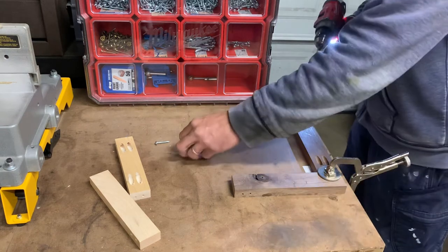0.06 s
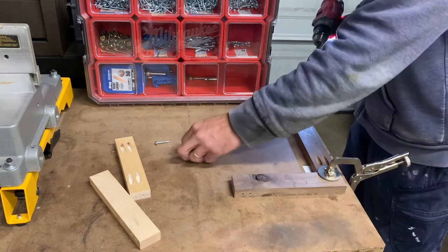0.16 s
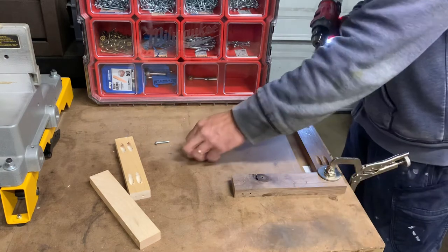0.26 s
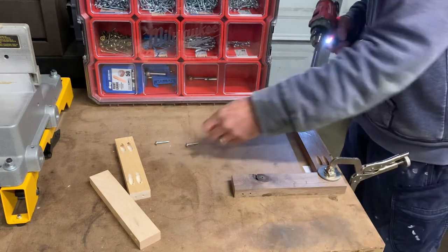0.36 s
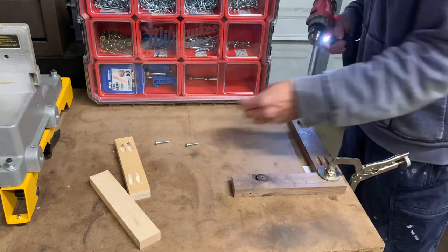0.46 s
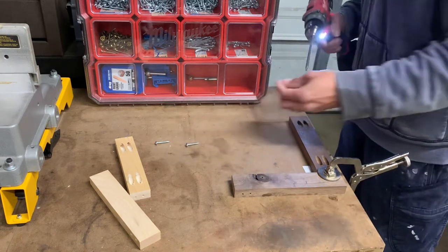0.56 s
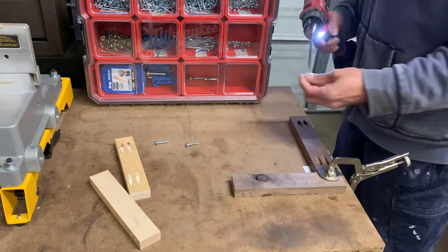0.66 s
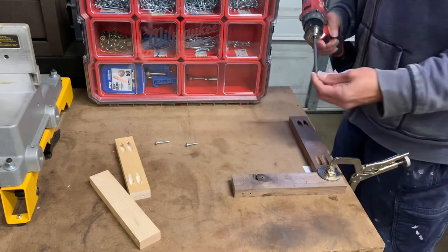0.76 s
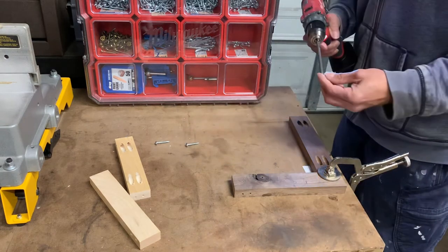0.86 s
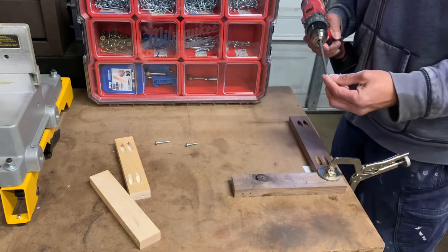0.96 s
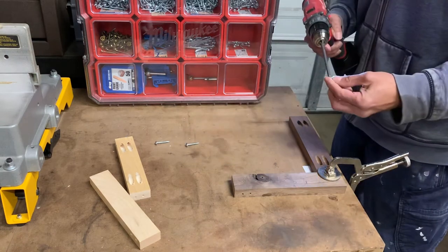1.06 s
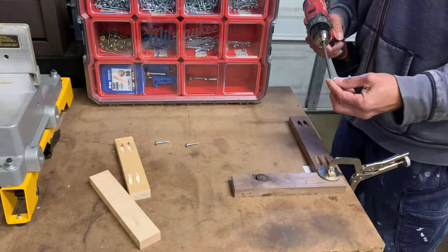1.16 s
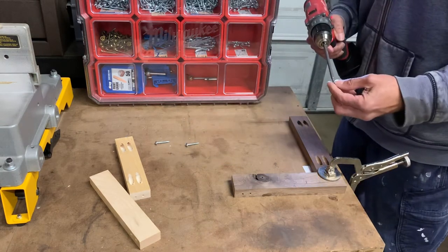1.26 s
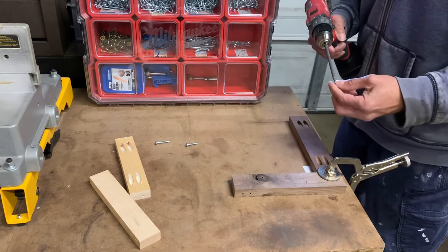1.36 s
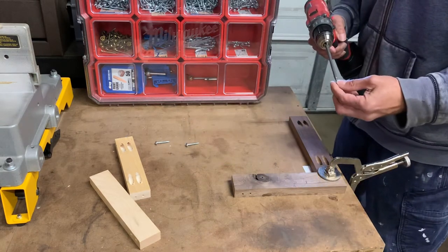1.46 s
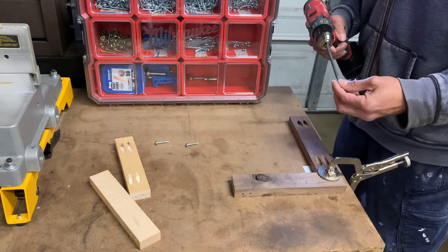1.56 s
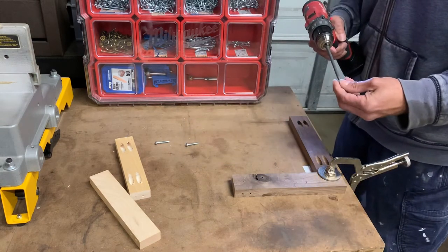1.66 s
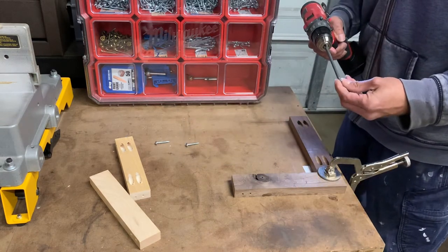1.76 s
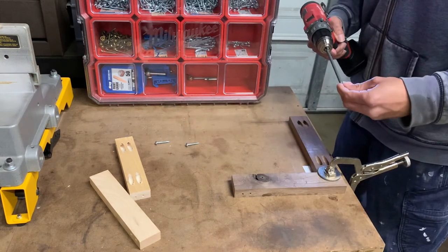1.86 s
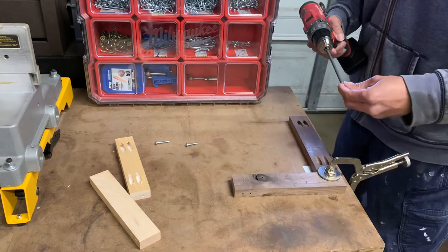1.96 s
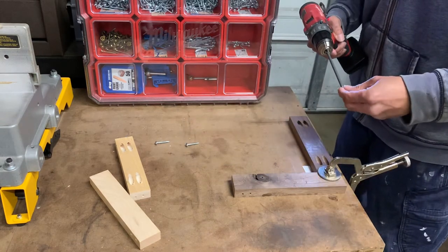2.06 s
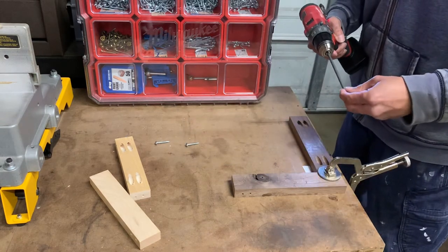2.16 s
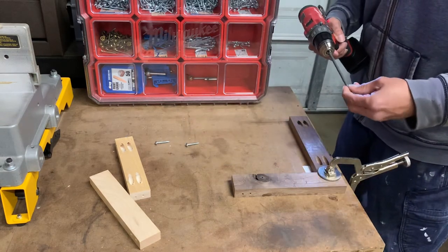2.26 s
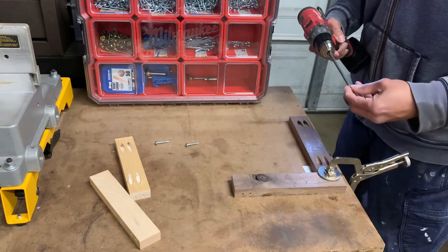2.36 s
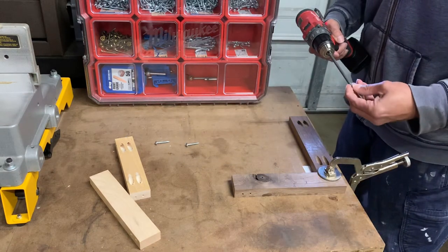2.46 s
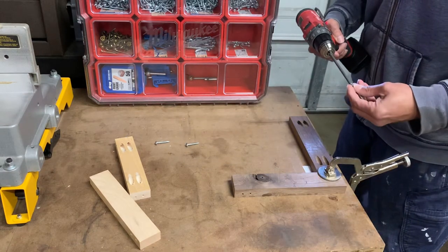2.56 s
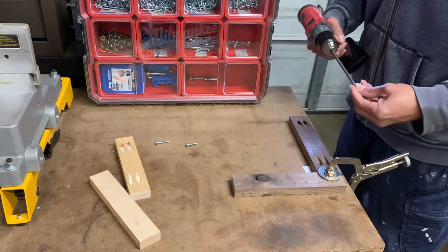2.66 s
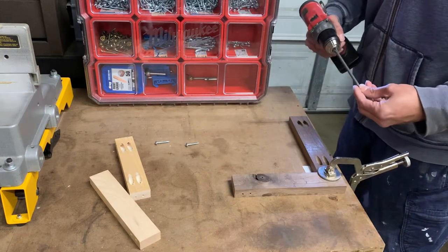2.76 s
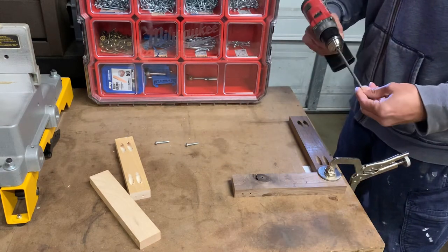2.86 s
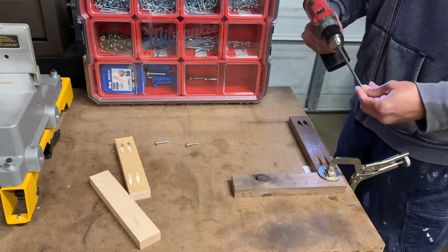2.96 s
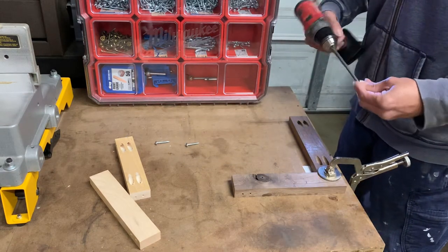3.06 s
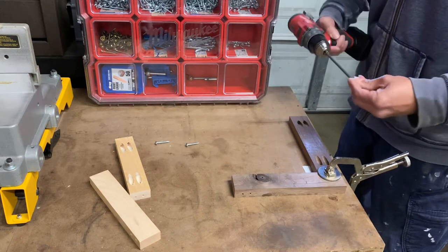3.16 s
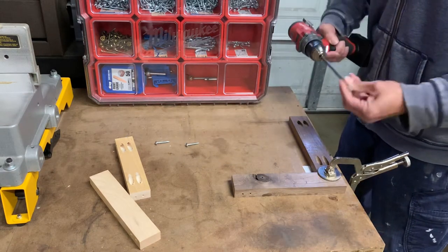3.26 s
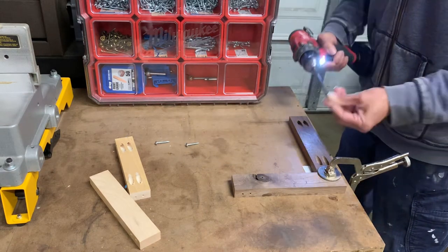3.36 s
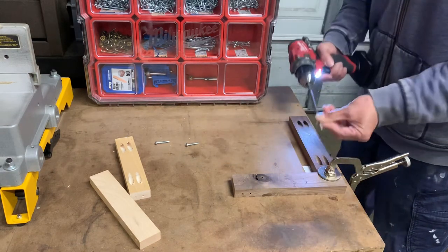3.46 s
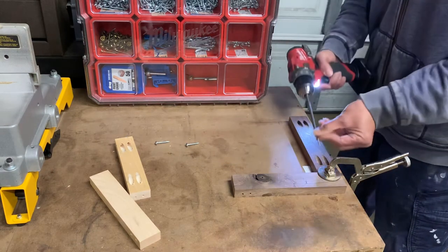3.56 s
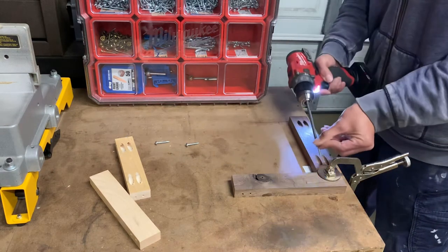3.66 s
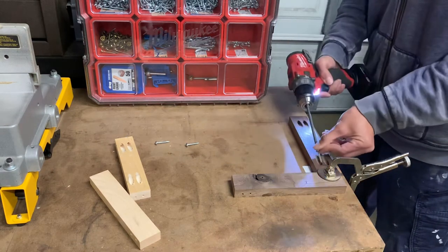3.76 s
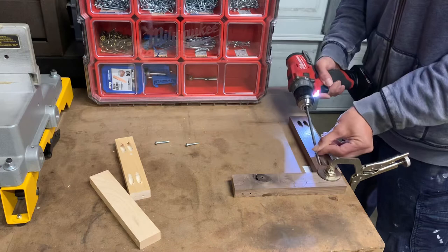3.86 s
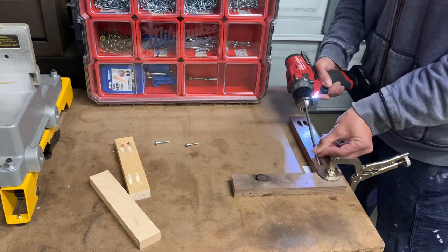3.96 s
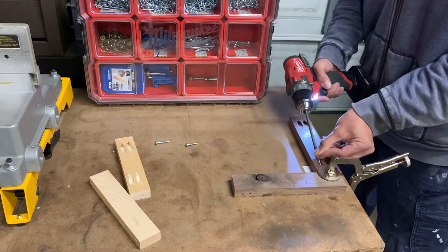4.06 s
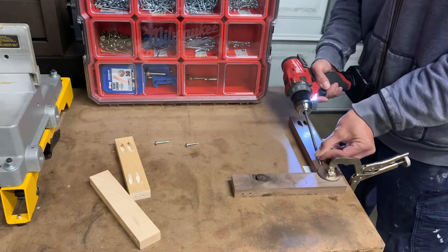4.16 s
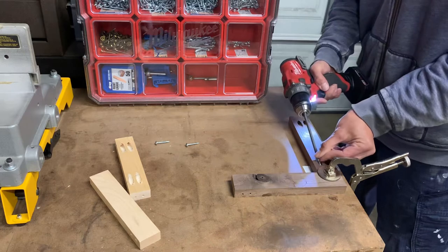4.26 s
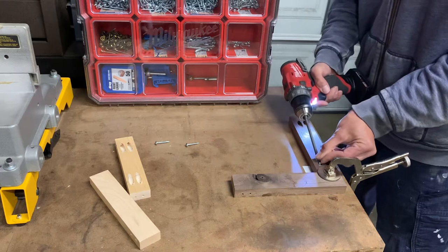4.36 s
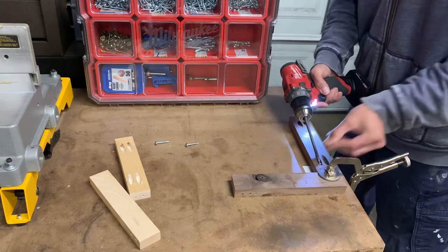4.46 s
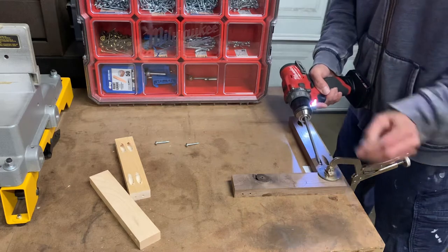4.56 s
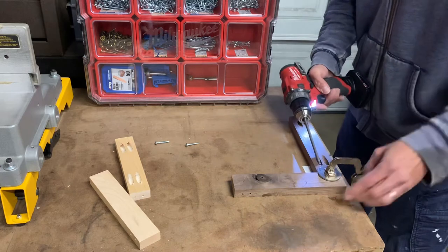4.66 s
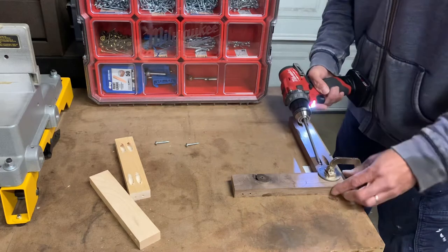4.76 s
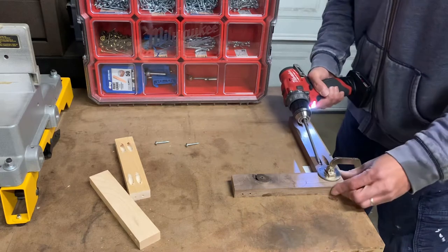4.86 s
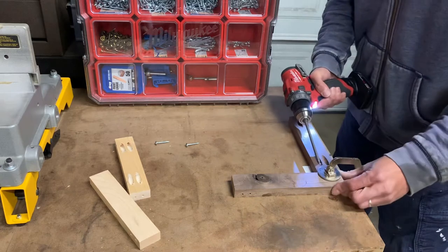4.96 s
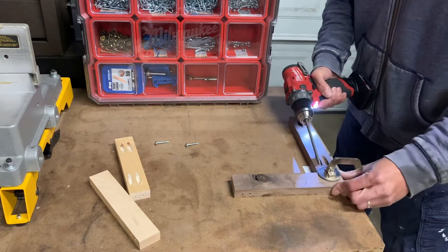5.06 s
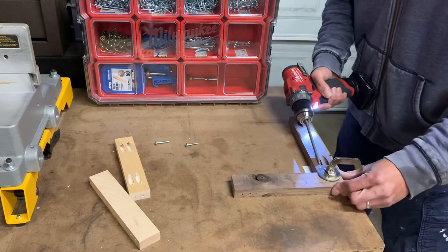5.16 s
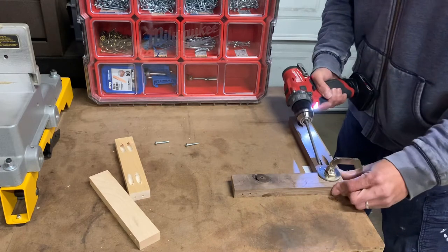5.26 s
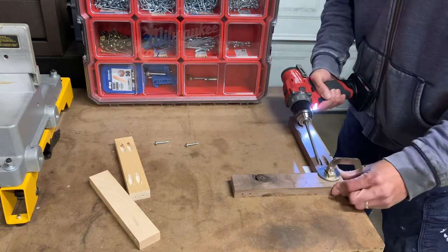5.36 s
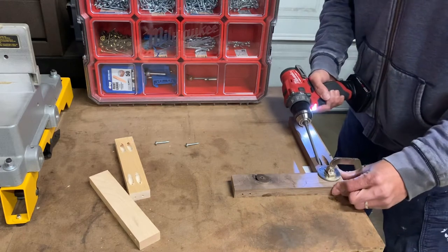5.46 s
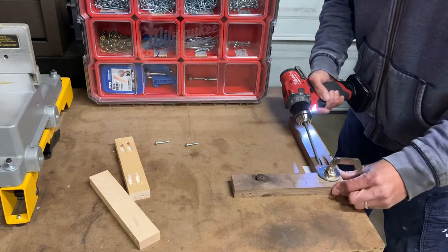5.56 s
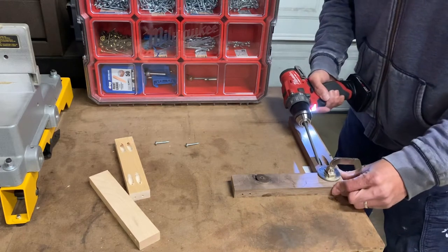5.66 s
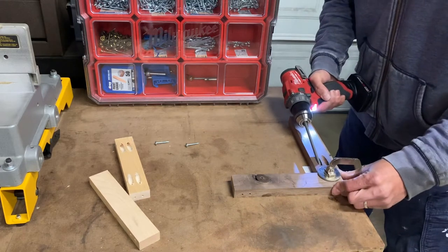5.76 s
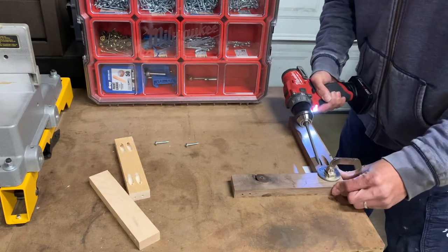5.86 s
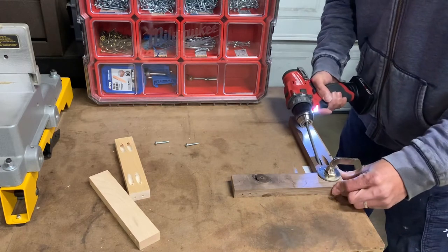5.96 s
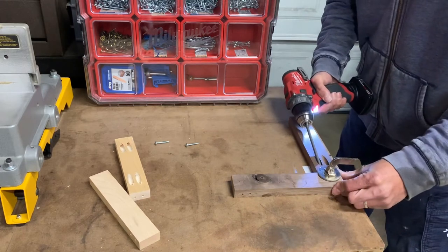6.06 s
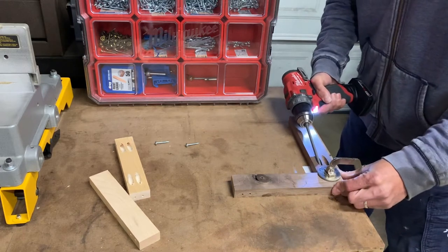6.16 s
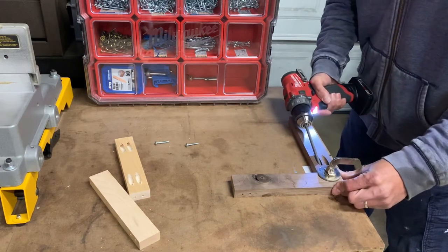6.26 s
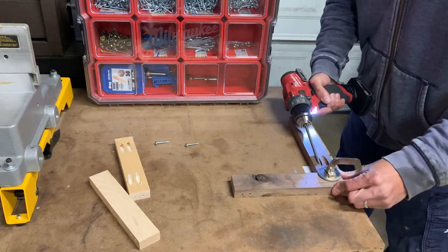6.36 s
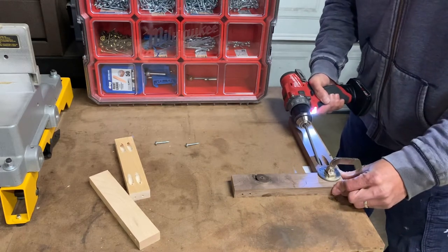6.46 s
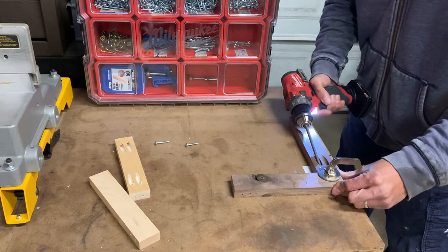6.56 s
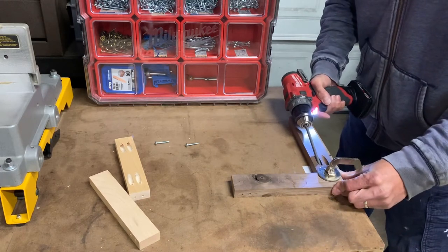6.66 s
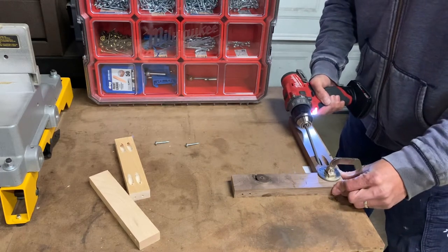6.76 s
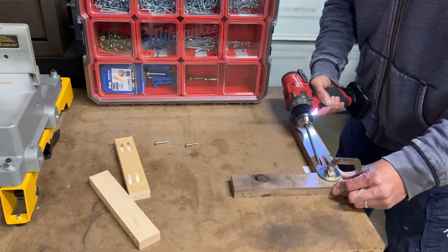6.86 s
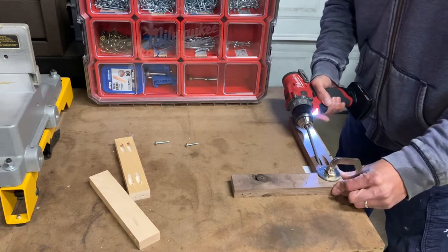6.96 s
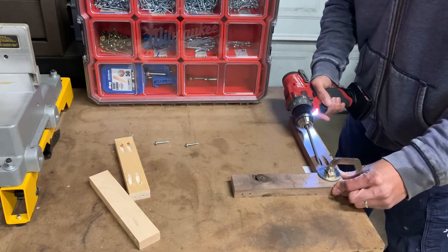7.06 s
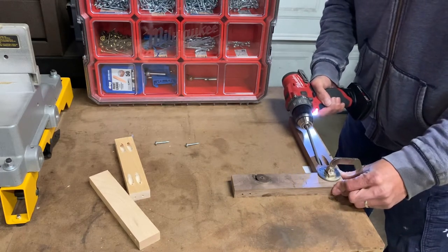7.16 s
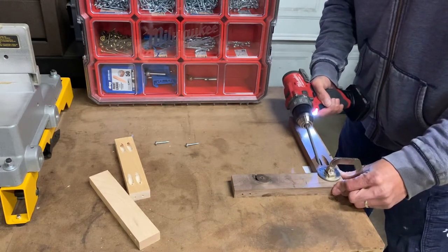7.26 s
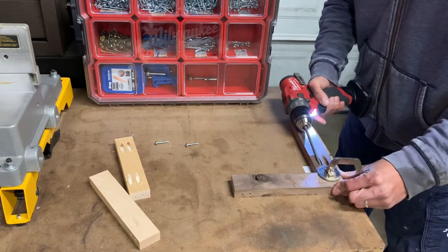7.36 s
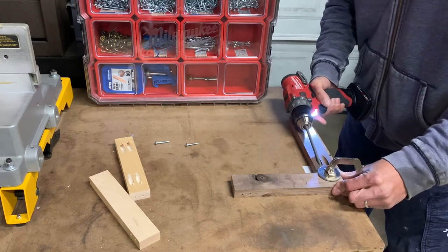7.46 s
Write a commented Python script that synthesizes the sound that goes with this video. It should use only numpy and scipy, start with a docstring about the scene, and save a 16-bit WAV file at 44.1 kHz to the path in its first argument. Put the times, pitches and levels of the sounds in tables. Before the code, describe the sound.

A screw is fitted onto a cordless drill's bit with tiny metallic ticks, heard from nearby over a quiet garage hum. Clothing rustles, and soft knocks and clatter follow as the bit is set against a clamped wooden joint. Seven quick trigger pulls drive the screw, each a click and a rising, falling gear whine with a thin whistle. The final pull ends in a sharp crack and a low thud from the bench.

```python
"""A small garage with a faint hum. A screw is fitted onto the long bit of a cordless drill, steel tapping
on steel, and set into a clamped wooden joint on a workbench, amid knocks and brushing sleeves.
Seven short trigger pulls spin the motor up and brake it: the gears whine and rattle with the shaft
speed, the chuck shakes and the chopped current makes the windings whistle. On the last pull the screw
seats and jolts the bench into its low modes. Near surfaces echo and the room reverberates."""
import sys
import numpy as np
from scipy import signal
from scipy.fft import rfft, irfft, next_fast_len
from scipy.io import wavfile
from scipy.ndimage import map_coordinates

SR = 44100
rng = np.random.default_rng(int(sys.argv[2]) if len(sys.argv) > 2 else 0)


def digitize_waveform(pressure):
    """Quantize a signal to 16-bit integers and store it at the path in sys.argv[1].

    Rows of a 2-D input are taken as channels; values are limited to [-1, 1].
    """
    field = np.atleast_2d(pressure).T
    bounded = np.clip(field, -1, 1)
    quanta = np.round(bounded * 32767).astype(np.int16)
    wavfile.write(sys.argv[1], SR, quanta)


N = 331191

# trigger pulls: (t/s, length/s, spin-up/(Hz/s), load level/dB, lead of the trigger's click/s)
PULLS = [(4.829, 0.26, 3235, -0.5, .054), (5.255, 0.19, 3468, 0, .059), (5.703, .155, 2865, 2, .054),
         (6.022, 0.18, 3169, 1.36, .055), (6.377, 0.14, 2920, 2, .059), (6.722, 0.16, 2880, 2.5, .049),
         (7.116, 0.15, 2495, 4.5, .051)]


def amp(db):
    """Amplitude ratio of a level in decibels."""
    return 10 ** (np.asarray(db) / 20)


def unit(x):
    """Normalisation to rms 1."""
    return x / np.sqrt(np.mean(x ** 2) + 1e-20)


def along(points, hz):
    """Interpolation of (f/Hz, value) points on a logarithmic frequency axis."""
    f, values = np.transpose(points)
    return np.interp(np.log(hz + 1), np.log(f + 1), values)


def wobble(rate):
    """Smooth random modulation: a spline through `rate` knots a second."""
    return map_coordinates(rng.standard_normal(N // 20), [np.arange(N) * rate / SR], mode="wrap")


def filtered(x, response):
    """Linear filtering: the spectrum of x times a frequency response."""
    size = next_fast_len(N + 8192)
    return irfft(rfft(x, size) * response(np.fft.rfftfreq(size, 1 / SR)), size)[..., :N]


def noise(spectrum):
    """Spectral shaping: coloured noise of rms 1."""
    return unit(filtered(rng.standard_normal(N), lambda hz: amp(along(spectrum, hz))))


def add(track, s, sound):
    """Superposition of a sound on a track, from s seconds on."""
    part = track[max(0, round(s * SR)):][:len(sound)]
    part += sound[:len(part)]


def fade(t60, attack):
    """Damping: half a second of envelope, a quick rise and an exponential decay."""
    t = np.arange(SR // 2) / SR
    return np.exp(-np.log(1000) * t / t60) * (1 - np.exp(-t / attack))


def ring(modes, attack, scatter_db):
    """Free vibration: a sum of damped modes, at new strengths for every blow."""
    t = np.arange(SR // 2) / SR
    return sum(amp(db + scatter_db * rng.standard_normal()) * fade(t60, attack)
               * np.sin(2 * np.pi * hz * t) for hz, db, t60 in modes)


def struck(envelope, spectrum):
    """Source and filter: noise bursts excite a minimum-phase body, which rings on after each."""
    size = next_fast_len(N + 8192)
    gain = unit(amp(along(spectrum, np.fft.rfftfreq(size, 1 / SR))))
    cepstrum = irfft(np.log(gain), size)
    fold = 1 + np.sign(np.fft.fftfreq(size))  # makes the response causal
    response = np.exp(rfft(cepstrum * fold))
    bursts = envelope * rng.standard_normal(N)
    return irfft(rfft(bursts, size) * response, size)[:N]


def contacts(rows, t60, rebound_s, rebound_db):
    """Inelastic rebound: the envelope of loose metal touching, then twice more, each time weaker."""
    envelope = np.zeros(N)
    for (s, db), gaps in zip(rows, rng.uniform(.5, 1.5, (len(rows), 2))):
        add(envelope, s, amp(db) * fade(t60, attack=0.00025))
        for k, lag in enumerate(np.cumsum(gaps) * rebound_s, 1):
            add(envelope, s + lag, amp(db + k * rebound_db) * fade(t60, attack=0.0013))
    return envelope


def background():
    """Ambient noise: a faint mains hum over still air, partly coherent between the ears."""
    air = [(25, -4.5), (60, -9), (120, 0.5), (170, -14), (400, -20), (1000, -35.5), (4000, -36),
           (11000, -35), (15000, -30), (16000, -42)]  # noise spectrum of the air: (f/Hz, relative level/dB)
    hum_hz, t = 119, np.arange(N) / SR
    hum = amp(-69.5 + 2.6 * wobble(2.8)) * np.sin(2 * np.pi * hum_hz * t + 0.43 * wobble(7.7))
    return hum + amp(-74.5) * noise(air) + amp(-74) * np.array([noise(air), noise(air)])


def handling():
    """Friction and forced vibration: sleeves brush, and the bench rumbles as it is leant on."""
    # arm movements: (t/s, length/s, brushing level/dB, relative rumble level/dB)
    moves = [(0.0, 0.024, -61, -68), (0.632, 0.28, -90, -70.5), (3.666, .6, -84.5, -68.5),
             (4.308, .02, -56.5, -51.5), (4.42, .25, -69.5, -66.5), (4.72, 3.27, -60.5, -65)]
    # spectra of the sleeves and of the bench's rumble: (f/Hz, relative level/dB)
    cloth = [(30, -3.5), (120, -17.5), (220, 1.5), (400, -4.5), (800, -8.5), (2500, -17), (6000, -26),
             (16000, -38)]
    bench = [(20, -6), (45, 1.5), (70, -2), (110, 5.5), (200, -16), (500, -60)]
    t, swell_s = np.arange(N) / SR, 0.077
    brush, rumble = amp(-84), amp(-77.5)  # hands held nearly still
    for s, length, brush_db, rumble_db in moves:
        before, after = np.maximum(s - t, 0), np.maximum(t - s - length, 0)
        swell = np.exp(-(before + after) / swell_s)
        brush = np.hypot(brush, amp(brush_db) * swell)  # incoherent sounds add in power
        rumble = np.hypot(rumble, amp(rumble_db) * swell)
    sleeves = brush * amp(1.2 * wobble(25)) * noise(cloth)
    return sleeves + rumble * amp(2.5 + 2.6 * wobble(7)) * noise(bench)


def knocks():
    """Impact excitation: each blow cracks on the joint and thumps the bench, whose low modes ring."""
    # blows on the wood: (t/s, knock level/dB, thump level/dB, t60/s), levels relative
    blows = [(0.01, -42.5, -58, 0.14), (0.168, -58.5, -52.5, 0.094), (0.641, -90, -55, 0.091),
             (3.125, -70.5, -92, 0.059), (3.672, -66, -76, 0.081), (3.697, -65.5, -52, 0.091),
             (4.211, -63, -50.5, 0.3), (4.281, -45.5, -48, 0.1), (4.314, -57, -30.5, 0.078),
             (4.425, -60.5, -48, 0.18), (4.602, -51.5, -74, 0.098), (4.676, -51.5, -53, 0.24),
             (4.787, -39, -64, 0.1), (4.859, -20.5, -40.5, 0.0077), (4.935, -55, -20, 0.014),
             (5.553, -42.5, -55, 0.091), (5.587, -54, -47, 0.046), (7.213, -15.5, -23, 0.045),
             (7.221, -12.5, -13.5, 0.034), (7.227, -12.5, -8, 0.037)]
    # responses of the joint and of the bench top: (f/Hz, relative level/dB)
    joint = [(100, -22), (400, -10.5), (700, -3), (950, -2), (1250, -0.5), (1480, 0.5), (1800, -5),
             (2200, -8), (2550, -3.5), (3000, -12), (7000, -26.5), (15000, -33.5)]
    bench_top = [(25, -40.5), (60, -17.5), (130, -0.5), (200, -2), (320, -3), (500, -10.5), (900, -16.5),
                 (3000, -49.5)]
    bench_modes = [(75.3, -10, 0.67), (100.5, 1.5, 0.23), (135.3, 1, 0.44), (209.6, -16, 0.6),
                   (310, -20, 0.69), (423.7, 2, 0.22), (677, -19, 0.33), (867, -31, 0.35)]  # (f/Hz, relative level/dB, t60/s)
    knock, thump, bench = np.zeros((3, N))
    for s, knock_db, thump_db, t60 in blows:
        add(knock, s, amp(knock_db) * fade(t60, attack=0.00055))
        add(thump, s, amp(thump_db - 1) * fade(t60, attack=0.0012))
        add(bench, s, amp(thump_db - 11.5) * ring(bench_modes, attack=0.0072, scatter_db=4))
    return struck(knock, joint) + struck(thump, bench_top) + bench


def screw_taps():
    """Impact of steel on steel: a tiny scrape, and the screw's modes ring briefly."""
    taps = [(0.804, -52, -41), (0.9743, -58, -58), (1.1628, -55.5, -64), (1.4988, -48, -57.5),
            (1.600, -46, -52), (1.613, -54, -47), (2.2912, -40, -38), (2.586, -51, -46)]  # screw against bit: (t/s, ring level/dB, scrape level/dB), levels relative
    screw_modes = [(1660, 0, 0.051), (1740, -17, 0.1), (3930, -2, 0.14), (4230, -4, 0.18), (4822, 2, 0.095),
                   (5400, -27, .1), (7133, -25, .13), (11600, -18, 0.07), (14000, -15, .08)]  # (f/Hz, relative level/dB, t60/s)
    scrape_spectrum = [(500, -6), (1200, -20), (1700, 0.5), (2200, -10.5), (3300, -16), (4000, 6.5),
                       (4900, -1.5), (6000, -6.5), (7200, -3.5), (9000, -7), (14500, 3.5), (16000, -13)]  # (f/Hz, relative level/dB)
    steel = np.zeros(N)
    for s, ring_db, _ in taps:
        add(steel, s, amp(ring_db - 19) * ring(screw_modes, attack=.001, scatter_db=3))
    scrapes = [(s, scrape_db) for s, _, scrape_db in taps]
    envelope = contacts(scrapes, t60=0.023, rebound_s=0.00665, rebound_db=-3.5)
    return steel + amp(-6.5) * struck(envelope, scrape_spectrum)


def shell_clunk():
    """Shell resonance: the drill rings hollow as it is swung down to the joint."""
    clunks = [(3.697, -63)]  # jolts of the shell: (t/s, relative level/dB)
    shell_modes = [(1200, -3, 0.12), (1506, -0.5, 0.12), (2406, -11, 0.19), (2550, -2, 0.07)]  # (f/Hz, relative level/dB, t60/s)
    shell = np.zeros(N)
    for s, db in clunks:
        add(shell, s, amp(db) * ring(shell_modes, attack=.002, scatter_db=1.5))
    return shell


def bit_seating():
    """Contact chatter: the long bit rebounds as it finds the screw head."""
    touches = [(4.3069, -33.5), (4.339, -35), (4.37, -40), (4.5516, -48), (4.6765, -34), (4.7129, -33.5),
               (4.741, -38.5), (4.7706, -35)]  # the bit settles and the clamp is nudged: (t/s, relative level/dB)
    bit = [(300, -3), (1200, -2.5), (1800, 2.5), (2200, -5), (2550, 4.5), (2900, -23), (3400, -10),
           (3750, 3), (4000, 5.5), (4500, -4), (7000, -9.5), (10500, -15), (14500, -4), (16000, -28)]  # response of the bit: (f/Hz, relative level/dB)
    return amp(-4.5) * struck(contacts(touches, t60=0.017, rebound_s=0.0073, rebound_db=-5.5), bit)


def clicks():
    """Brief, damped impacts are broadband: bit and gears snap, and the trigger clicks before each pull."""
    snaps = [(4.859, -20.5), (5.219, -42.5), (7.218, -14.5)]  # hard contacts of bit and gear train: (t/s, relative level/dB)
    snap_spectrum = [(200, -46), (800, -0.5), (1600, 5.5), (2300, 0), (3300, 10.5), (5000, -3.5),
                     (7000, 4.5), (10000, 2.5), (14500, 3.5), (16000, -14)]  # (f/Hz, relative level/dB)
    trigger = [(s - lead, -40.5) for s, *_, lead in PULLS]
    envelope = np.zeros(N)
    for s, db in snaps + trigger:
        add(envelope, s, amp(db + 6.5) * fade(t60=.009, attack=.0005))
    return struck(envelope, snap_spectrum)


def motor():
    """Uniform acceleration towards full speed, then braking: gives shaft speed/Hz and load level/dB."""
    full_speed_hz, brake_hz_per_s, ease_hz = 452.3, 6500, 40
    strain_db, strain_s = 9.5, 0.046  # the gears are louder as they take up the load
    braking_db = 0.33  # and clash again while the brake holds them back
    speed, load_db = np.zeros((2, N))
    for s, length, spin_up, db, _ in PULLS:
        first = round(s * SR)
        age = np.arange(N - first) / SR
        run_down = brake_hz_per_s * (length - age)
        limits = np.array([spin_up * age, np.full_like(age, full_speed_hz), run_down])
        speed[first:] = -ease_hz * np.logaddexp.reduce(-limits / ease_hz)  # lowest limit, corners rounded
        braking = np.exp((speed[first:] - run_down) / ease_hz)  # 0 under power, 1 on the brake
        load_db[first:] = db + strain_db * np.exp(-age / strain_s) + braking_db * braking
    return np.maximum(speed, 0), load_db


def gear_whine(speed, turns):
    """Forced resonance: shaft and tooth tones glide with speed and flare across the gearbox's modes."""
    # shaft and gear tones: (multiple of shaft speed, relative level/dB at speed 400 Hz, speed exponent)
    orders = [(1, -24, 5.7), (2, -44.5, 2.7), (3, -55, 2.1), (4, -26.5, 3.25), (5.6, -43.5, 6),
              (7, -58.5, 1.8), (8, -38, 1.53), (16, -33, 1.59)]
    housing = [(3340, 286, 14), (3470, 90, 2.5)]  # gearbox resonances: (f/Hz, bandwidth/Hz, level/dB)
    tones = np.zeros(N)
    for multiple, db, growth in orders:
        phase = 2 * np.pi * multiple * turns + .2 * wobble(120)
        phase += .015 * multiple * wobble(500)  # backlash blurs the high orders
        flutter = amp(2 * wobble(160))
        tones += amp(db - 4) * flutter * (speed / 400) ** growth * np.sin(phase)
    return filtered(tones, lambda f: 1 + sum(
        amp(db) * 1j * f * width / (centre ** 2 - f ** 2 + 1j * f * width)
        for centre, width, db in housing))


def switching_whistle(speed, turns):
    """Modulation: chopped current makes the windings whistle at each start; rotation adds a sideband."""
    whistle_hz, soft_start_s = 9915, .1
    ramp = np.linspace(0, 1, round(soft_start_s * SR))
    chopping = np.minimum(ramp / .12, 1) * np.cos(np.pi / 2 * ramp)
    envelope = np.zeros(N)
    for s, *_ in PULLS:
        add(envelope, s, chopping)
    phase = 2 * np.pi * whistle_hz * np.arange(N) / SR + .45 * wobble(200)
    sideband = speed / 200 * np.sin(phase + 2 * np.pi * 4 * turns)
    return amp(-38) * envelope * (np.sin(phase) + sideband)


def gear_rattle(speed, turns):
    """Amplitude modulation: teeth and brushes hiss in bursts tied to the shaft, levelling off at speed."""
    hiss = [(150, -27), (500, -23), (1200, -4.5), (2400, -1.5), (2900, -3.5), (3400, 5), (4200, -3),
            (7200, -2), (8100, 3.5), (9000, 3.5), (10500, -1), (12500, -5.5), (14300, -4.5), (15800, -20.5)]  # spectrum of teeth and brushes: (f/Hz, relative level/dB)
    bursts_db = 0.47 * np.sin(2 * np.pi * turns) + 1.3 * np.sin(4 * np.pi * turns) + 1.4 * wobble(700)
    return amp(-27.5) * np.tanh(speed / 190) ** 2.03 * unit(amp(bursts_db)) * noise(hiss)


def chuck_rumble(speed):
    """First-order lag: chuck and bit shake in the screw head, building and dying behind the speed."""
    chuck = [(30, -56), (100, -9.5), (170, -12.5), (240, -4.5), (295, 6), (365, -13), (440, 1.5),
             (560, -17.5), (690, -0.5), (850, -6.5), (1250, -9.5), (2500, -24), (6000, -24)]  # spectrum of the shaking: (f/Hz, relative level/dB)
    lag_s = 0.019
    pole = np.exp(-1 / (lag_s * SR))
    shake = signal.lfilter([1 - pole], [1, -pole], np.tanh(speed / 230) ** 1.97)
    return amp(-31.5) * shake * noise(chuck)


def drill():
    """Rotating machinery: one shaft speed governs both the tones and the broadband noise."""
    speed, load_db = motor()
    turns = np.cumsum(speed) / SR
    tones = amp(load_db) * gear_whine(speed, turns) + switching_whistle(speed, turns)
    rattle = amp(load_db) * (gear_rattle(speed, turns) + chuck_rumble(speed))
    return tones, rattle


def near_walls(x):
    """Early reflections: bench top and storage boxes send different delayed copies to each side."""
    def echo(hz, delay_s, db):
        return amp(db) * np.exp(-2j * np.pi * hz * delay_s) * hz / (hz + 500)  # small faces mirror no bass
    return filtered(x, lambda hz: np.array([echo(hz, 0.000862, -11) + echo(hz, 0.00127, -14.5),
                                            echo(hz, 0.000984, -11) + echo(hz, 0.0047, -3.5)]))


def garage(x):
    """Reverberation: a diffuse tail, alike at both ears in the bass; the highest treble dies first."""
    decay_times = [(100, 0.86), (300, 0.21), (1000, 0.27), (3500, 0.3), (7000, 0.27), (15000, 0.17)]  # reverberation time: (f/Hz, t60/s)
    tail_levels = [(100, -12), (300, -1), (700, -2), (3000, 0.5), (7000, -3.5), (15000, -12.5)]  # strength of the tail: (f/Hz, relative level/dB)
    spread = [(100, -17.5), (300, -13.5), (700, 2.5), (2500, 2.5), (7000, 2)]  # width of the tail: (f/Hz, side-minus-mid level/dB)
    hz, t, diffuse = signal.stft(rng.standard_normal((2, SR * 3 // 4)), SR, nperseg=256)
    decay = amp(-60 * t / along(decay_times, hz)[:, None])
    energy = np.sum(decay ** 2, axis=1, keepdims=True) * t[1] * SR
    decay *= amp(along(tail_levels, hz))[:, None] / np.sqrt(energy)
    width = np.arctan(amp(along(spread, hz)))[:, None]
    mid, side = signal.istft(diffuse * decay * np.array([np.cos(width), np.sin(width)]), SR, nperseg=256)[1]
    delayed = np.pad(x, (round(.002 * SR), 0))  # travel by way of the first wall
    return signal.fftconvolve(delayed[None], [mid + side, mid - side], axes=1)[:, :N]


def scene():
    """Direct plus reflected sound from one spot; the drill's tones beam at the listener and stay drier."""
    tones, rattle = drill()
    work = rattle + screw_taps() + bit_seating() + clicks() + shell_clunk() + knocks() + handling()
    scattered = work + amp(-1) * tones
    return amp(0.5) * (work + tones + near_walls(scattered) + garage(scattered)) + background()


def record(dry):
    """Interchannel phase and level: in the top octave both sides carry one sound, shifted in phase."""
    phase_lead = [(0, 0), (6300, 0), (7300, -1.1), (8400, -3.1), (8900, -3.2), (10500, -6.2), (11600, -6.3),
                  (12900, -9.4), (14000, -9.5), (15200, -12.5)]  # lead of the left channel: (f/Hz, phase/rad)
    # balance: (f/Hz, left-minus-right level/dB)
    balance = [(100, 0.5), (400, 1.0), (700, 5), (1300, 1.5), (2400, 0.0), (4400, -2.5), (8000, 0.56)]
    low_cut_hz, top_hz = 42, 15900
    separation = lambda hz: np.cos(np.clip((hz - 6300) / 1500, 0, 1) * np.pi / 2)
    left, right = dry
    left = filtered(left, separation) + filtered(right, lambda hz: 1 - separation(hz))
    left = filtered(left, lambda hz: np.exp(1j * along(phase_lead, hz)))
    pair = filtered(np.array([left, right]), lambda hz: amp(np.outer([.5, -.5], along(balance, hz))))
    pair = signal.sosfilt(signal.butter(2, low_cut_hz, "highpass", fs=SR, output="sos"), pair)
    return filtered(pair, lambda hz: hz < top_hz)


dry = scene()
out = record(dry)
digitize_waveform(out)
```